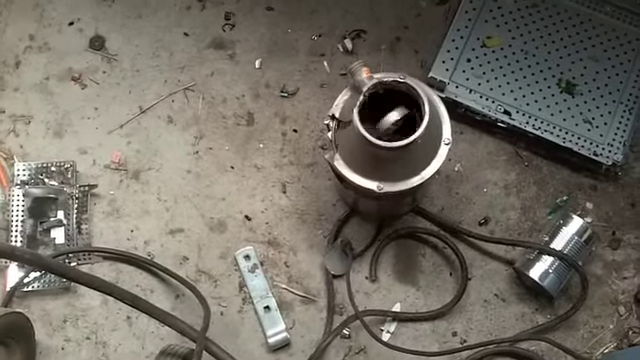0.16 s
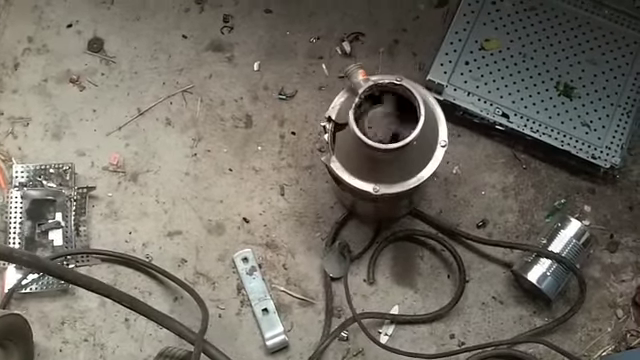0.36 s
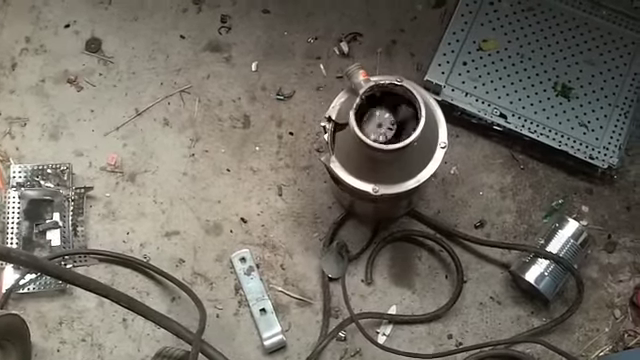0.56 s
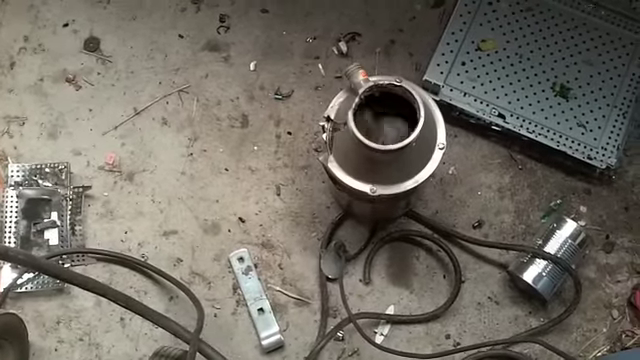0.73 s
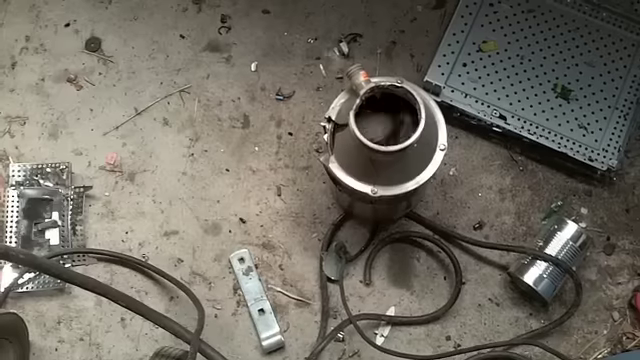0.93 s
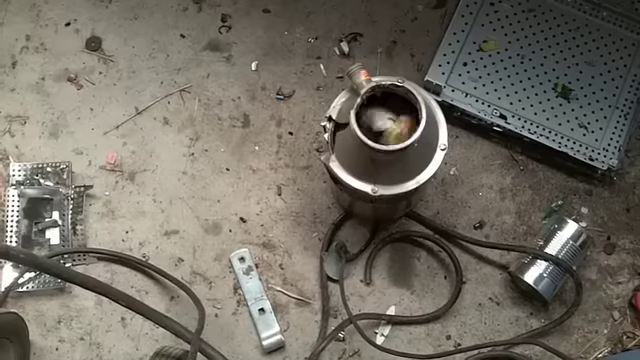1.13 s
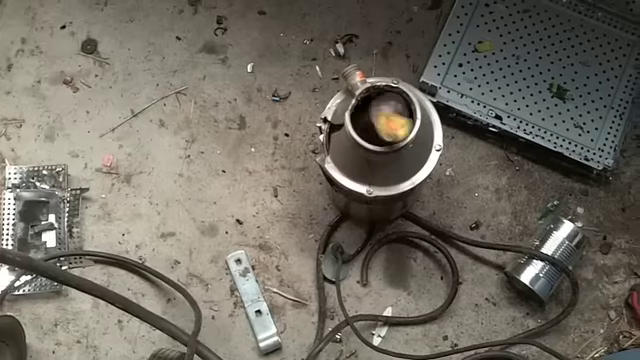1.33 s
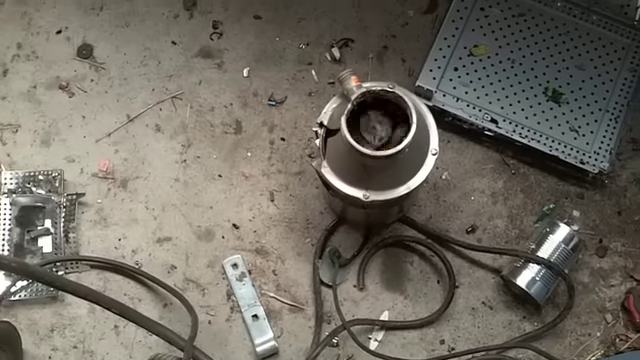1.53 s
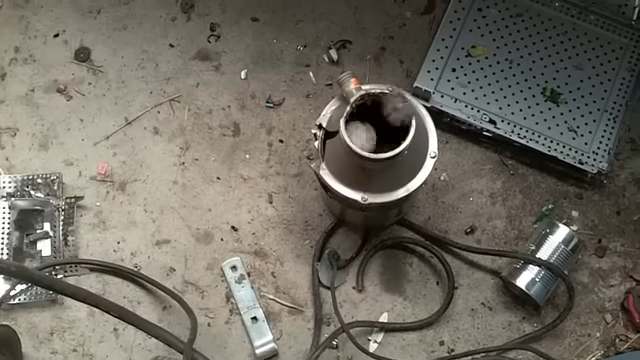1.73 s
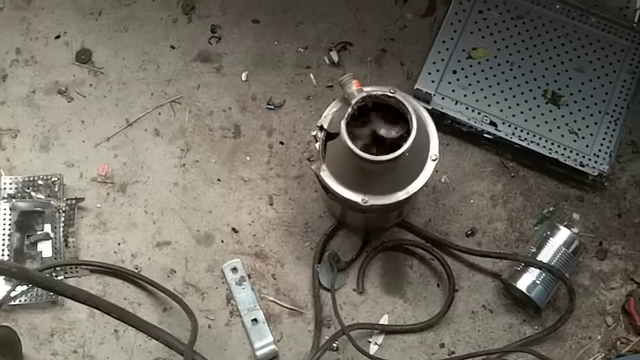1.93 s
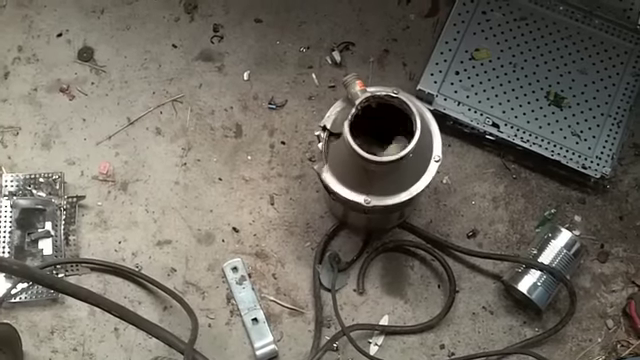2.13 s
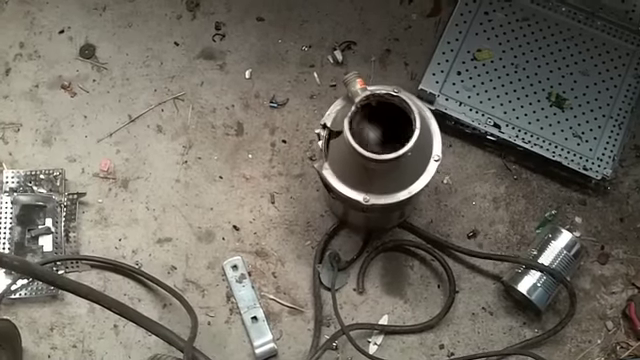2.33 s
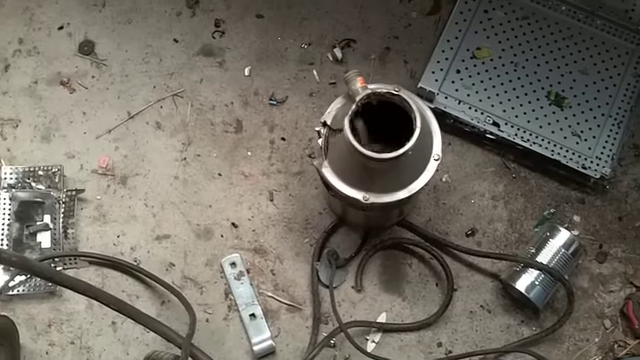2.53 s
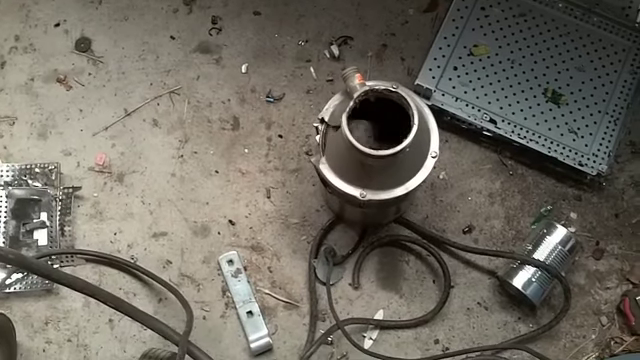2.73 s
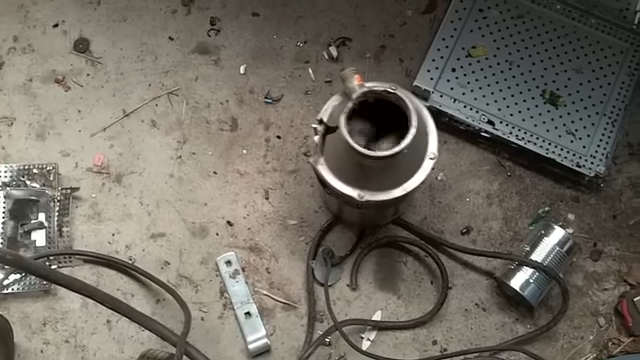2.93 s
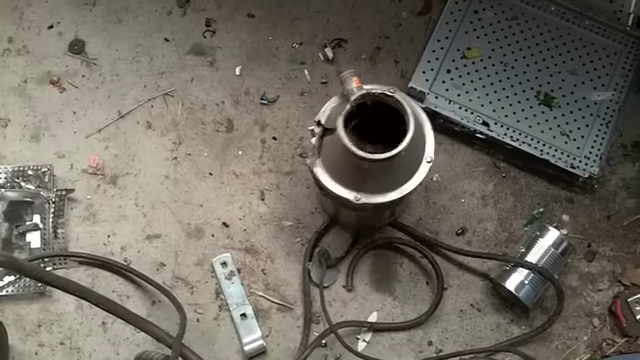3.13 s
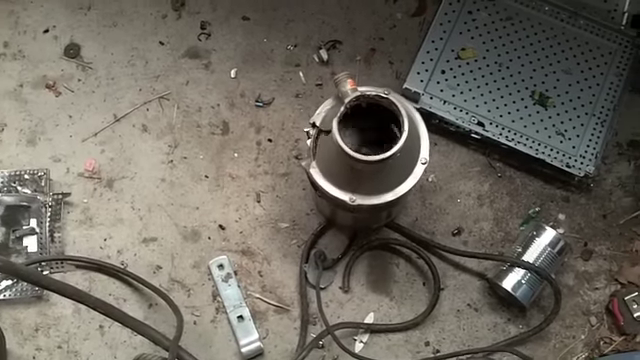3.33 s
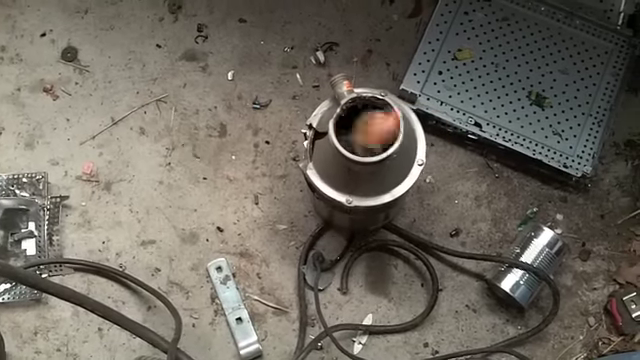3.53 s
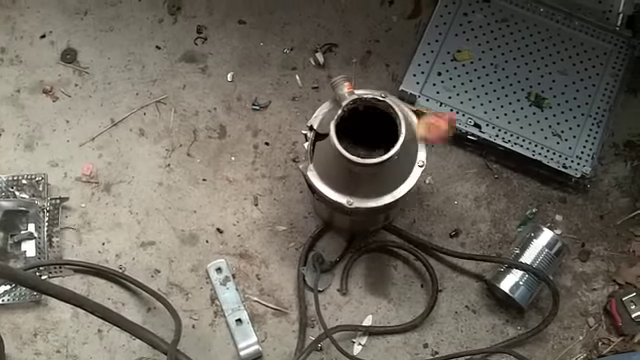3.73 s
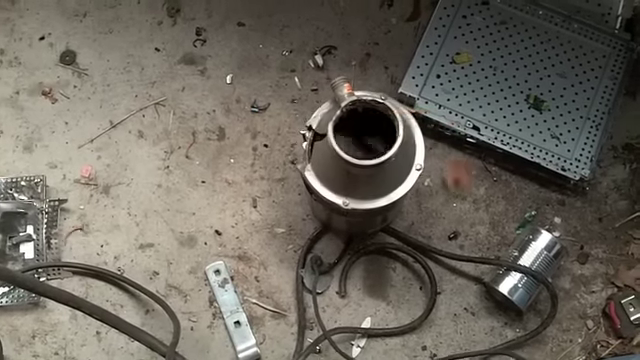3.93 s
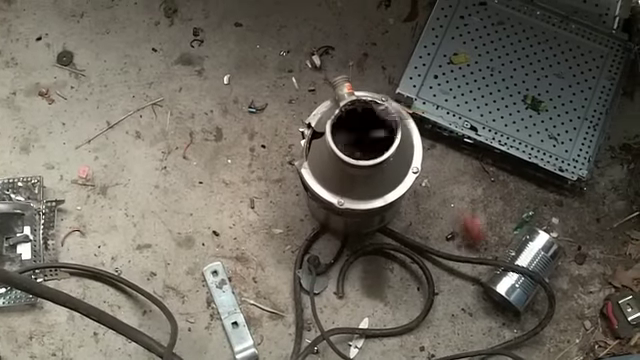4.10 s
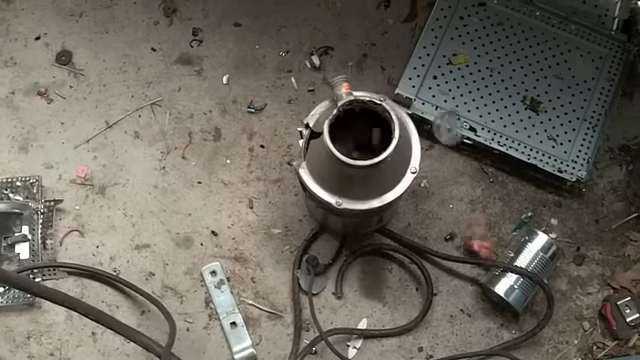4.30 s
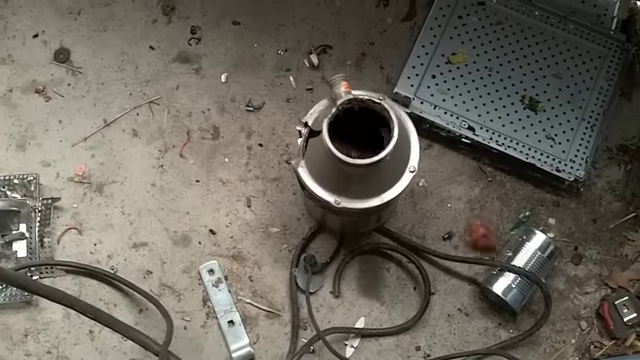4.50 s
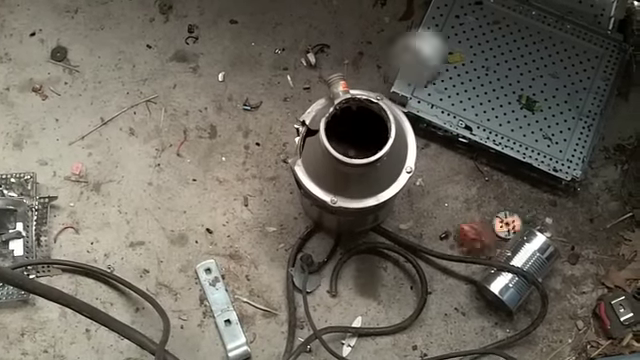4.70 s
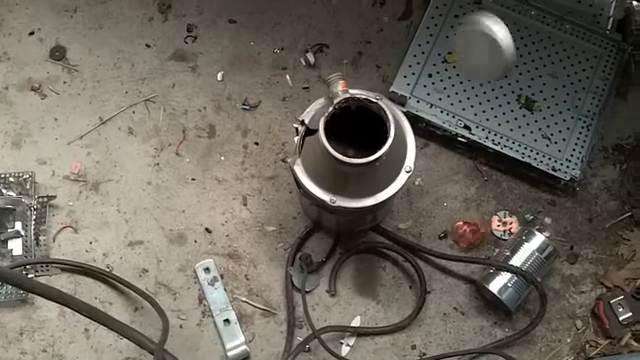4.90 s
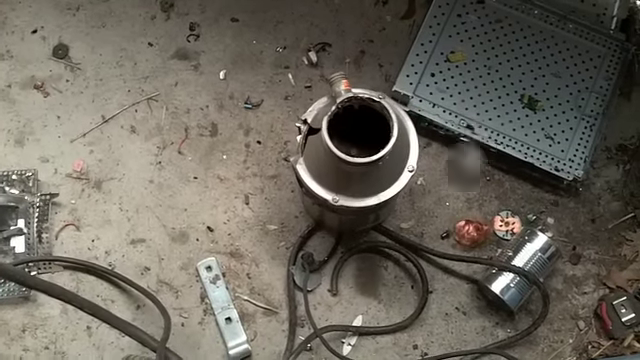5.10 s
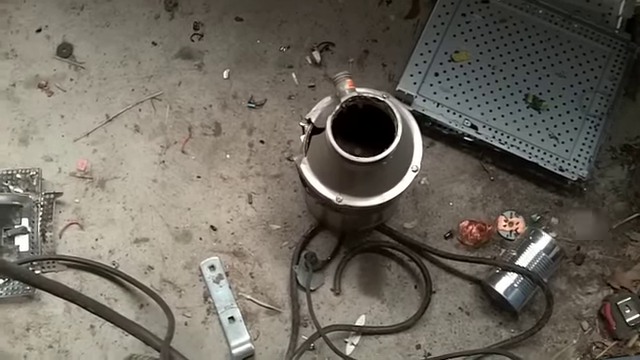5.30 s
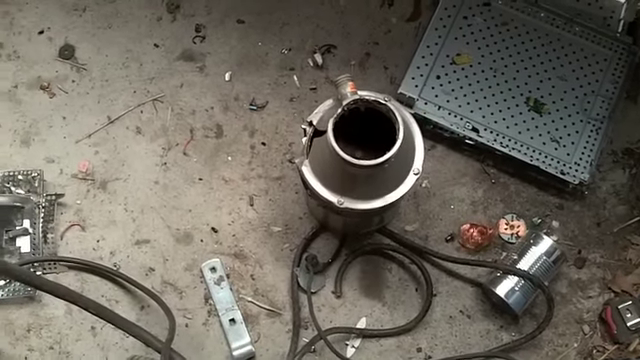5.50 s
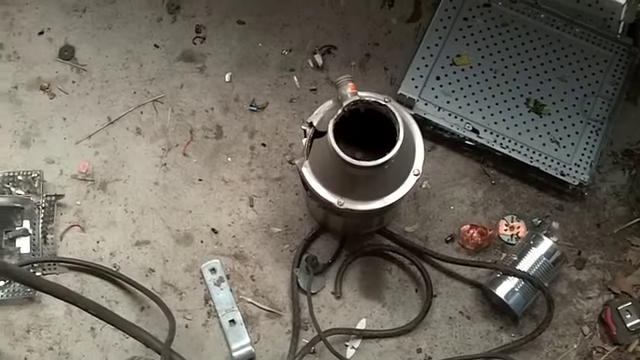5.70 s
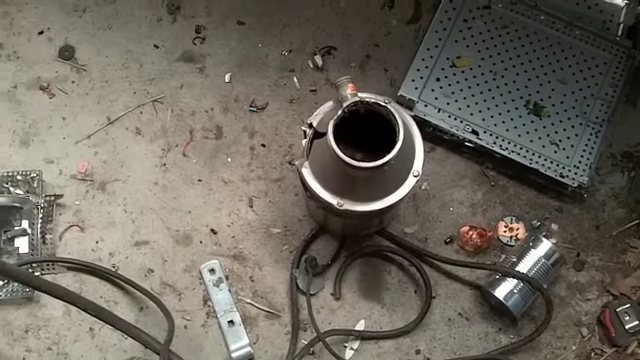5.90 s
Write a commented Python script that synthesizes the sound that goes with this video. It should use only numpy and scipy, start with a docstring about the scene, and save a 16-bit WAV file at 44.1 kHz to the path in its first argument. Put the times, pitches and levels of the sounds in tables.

```python
"""Garbage disposal, bare on a workshop floor, with loose metal in its chamber, close to a small microphone.
The spinning plate hurls the metal at the steel shell: short force bursts and swept scraps drive shell modes.
Once the metal is thrown out, the motor hums on nearly empty: wavering tones, housing rock, churned air.
A flung piece lands, rings and bounces: noise cracks with clatter, and modes that flutter as it tumbles."""
import sys
import numpy as np
from scipy import signal
from scipy.fft import rfft, irfft
from scipy.io import wavfile

SR = 44100
rng = np.random.default_rng(int(sys.argv[2]) if len(sys.argv) > 2 else 0)


def store_pcm(level_fs):
    """Save levels as 16-bit WAV."""
    pcm = np.round(np.clip(level_fs, -1, 1) * 32767).astype(np.int16)
    wavfile.write(sys.argv[1], SR, np.atleast_2d(pcm).T)


N = 262395
TIME = np.arange(N) / SR

# small scraps swept round the chamber: t/s, level/dB
SCRAP_LEVELS = [(0, -29), (4.05, -30), (4.18, -38), (4.21, -41), (4.238, -35), (4.26, -30.5), (4.62, -33),
                (4.66, -36.5), (4.8, -41), (4.86, -50), (5.1, -50.5), (5.95, -53)]
# metal hurled squarely against the wall: t/s, relative level/dB, thud/dB
WALL_KNOCKS = [(.157, -11, 0), (0.34, -12.5, 2.5), (.448, -16, 4), (0.593, -12.5, -6), (.708, -15, 0.5),
               (.798, -14, 4.5), (1.13, -23.5, 1.5), (1.206, -14.5, -0.5), (1.263, -9, 4), (1.48, -13, -5),
               (1.58, -12.5, -10), (1.6, -17, 4.5), (1.689, -13.5, 1.5), (1.824, -13.5, -3),
               (1.916, -12, -2), (2.048, -10, -11), (2.194, -18.5, 4.5), (2.564, -18, -3),
               (2.63, -13.5, -3), (2.691, -13, -20), (2.891, -15, -3), (2.944, -16.5, 0.5),
               (3.131, -16.5, -18), (3.201, -13, 1), (3.527, -15, -1), (3.675, -11, -0.5),
               (3.843, -9, -4.5), (4.132, -17.5, -8), (4.165, -10, -8.5), (4.248, -12.5, -4),
               (4.294, -18, 8.5), (4.369, -14.5, 1), (4.43, -13, 1), (4.469, -11, -11), (4.515, -20.5, 9)]


def amp(db):
    """Decibels to linear gain."""
    return 10 ** (np.asarray(db) / 20)


def unit(x):
    """Scale to rms 1."""
    return x / np.sqrt(np.mean(x ** 2) + 1e-20)


def normed(response):
    """Scale an impulse response to energy 1."""
    return response / np.linalg.norm(response)


def curves(rows):
    """Interpolate each column of a time table at every sample."""
    s, *columns = np.transpose(rows)
    return [np.interp(TIME, s, column) for column in columns]


def read(points, hz):
    """Interpolate a frequency table on a log axis."""
    f, value = np.transpose(points)
    return np.interp(np.log(hz + 1), np.log(f), value)


def add(mix, s, sound):
    """Mix a sound in, in place, from time s."""
    start = max(round(s * SR), 0)
    part = mix[start:][:len(sound)]
    part += sound[:len(part)]


def through(x, response):
    """Convolve x with an impulse response, cut to N."""
    return signal.oaconvolve(x, response)[:N]


def wander(rate_hz):
    """Smooth random curve of rms 1: noise with a Gaussian roll-off at rate_hz."""
    hz = np.fft.rfftfreq(N, 1 / SR)
    spectrum = rfft(rng.standard_normal(N))
    return unit(irfft(spectrum * np.exp(-(hz / rate_hz) ** 2), N))


def colour(points, peaks=(), size=4096):
    """Minimum-phase impulse response of a spectrum with resonances or dips on it."""
    hz = np.fft.rfftfreq(size, 1 / SR)
    gain = amp(read(points, hz))
    for centre_hz, width_hz, db in peaks:
        offset_hz = hz - centre_hz
        gain = gain * abs((offset_hz + .5j * width_hz * amp(db)) / (offset_hz + .5j * width_hz))
    log_gain = np.log(np.concatenate([gain, gain[-2:0:-1]]))
    causal_spectrum = np.exp(np.conj(signal.hilbert(log_gain)))
    return np.fft.ifft(causal_spectrum).real[:size // 2]


def tail(decays, size=22050):
    """Dense thicket of modes or echoes: random signs, each band decaying at its own t60."""
    hz, t, z = signal.stft(rng.choice([-1., 1.], size), SR, nperseg=128)
    decay = amp(-60 * t / read(decays, hz)[:, None])
    return normed(signal.istft(z * decay, SR, nperseg=128)[1])


def contact(force, level_db, thud_db, bright_db, hollow_db=0, own_modes=()):
    """Contact-force burst: heavy blows have more low end, sharp edges more treble."""
    points = [(750, 1.22 * thud_db + hollow_db), (1100, thud_db), (2000, thud_db),
              (3200, 0.014), (5000, 0.011), (7500, bright_db)]
    return amp(level_db) * np.convolve(unit(force), colour(points, own_modes, size=512))


def motor():
    """Wavering hum, the unmounted housing rocking on the floor, and churned air."""
    # motor vibration: t/s, hum/dB, fast rock/dB, slow rock/dB
    vibration = [(0, -73.5, -67, -71), (4.45, -65, -80, -71), (4.68, -57, -70, -64),
                 (4.78, -49.5, -46.5, -45), (5.3, -50, -52, -78), (5.48, -50.5, -61, -45),
                 (5.8, -52, -56, -45.5), (5.95, -50, -54, -52)]
    # tones of shaft, magnetic pull and casing: f/Hz, level re hum/dB
    hum_tones = [(29.6, -4), (120, -3), (150, -12), (239.5, -9), (391, -12), (591, -13), (631, -13.5)]
    # spectrum shape of air churned by the rotor: f/Hz, relative density/dB per Hz
    air_spectrum = [(20, 0), (100, 7), (180, -4.5), (260, 4.5), (500, -1), (630, 3.5), (900, -6),
                    (1600, -3), (3000, -12), (6000, -64), (16000, -71)]
    fast_rock_hz, slow_rock_hz = 70.4, 48.4

    def tone(hz, waver_rad):
        """Sine of rms 1 with slow random phase waver."""
        cycles = hz * TIME + rng.random()
        return np.sqrt(2) * np.sin(2 * np.pi * cycles + waver_rad * wander(1.8))

    hum_db, fast_db, slow_db = curves(vibration)
    hum = amp(hum_db) * sum(amp(db) * tone(hz, waver_rad=0.23) for hz, db in hum_tones)
    fast_rock = amp(fast_db) * tone(fast_rock_hz, waver_rad=0.33)
    slow_rock = amp(slow_db) * tone(slow_rock_hz, waver_rad=0.23)
    air = amp(hum_db + 0.5) * through(rng.standard_normal(N), normed(colour(air_spectrum)))
    return hum + fast_rock + slow_rock + air


def tumbling_ring(ring_db, low_db):
    """Piece modes swell and flutter as its faces turn towards the microphone and away."""
    # modes of the flung piece: f/Hz, level/dB, t60/s, bloom time/s
    piece_modes = [(2030, 5.5, .26, .06), (3270, -16, .15, .005), (3480, -11, .2, .005),
                   (4100, 0, .24, .04), (4720, 2.5, .2, .015), (6230, -16, .25, .03),
                   (7690, -11, .15, .005), (11090, -22, .12, .005)]
    slowest_spin_hz = 20.3
    t, ring = TIME[:SR // 2], 0
    for hz, db, t60_s, bloom_s in piece_modes:
        phase = 2 * np.pi * (hz * t + rng.random())
        spin_hz = slowest_spin_hz * rng.uniform(1.0, 1.41)
        facing = np.cos(2 * np.pi * (spin_hz * t + rng.random()))
        mode = facing * np.sin(phase) + .4 * np.cos(phase)
        decay = amp(ring_db + db + low_db * (hz < 2500) - 60 * t / t60_s)
        bloom = 1 - np.exp(-(t / bloom_s) ** 2)
        ring = ring + decay * bloom * mode
    flutter_db = 2.2 * wander(70)[:len(t)]
    return ring * amp(flutter_db)


def flung_piece():
    """Each landing is a short noise crack with a clatter after it, and sets the piece ringing."""
    # landings: t/s, crack/dB, brightness/dB, clatter re crack/dB, ring/dB, extra ring below 2.5 kHz/dB
    landings = [(5.264, -15, 13, -4, -17, 1.5), (5.5377, -24, -3, 10, -27, -10),
                (5.55, -11.5, -7, -1.5, -30, -3), (5.603, -41, -3, 18, -20.5, -8),
                (5.628, -22, -1, -3, -56, -4), (5.725, -29, -4, 2.5, -35, -11)]
    # impact on the floor, spectrum shape: f/Hz, relative density/dB per Hz
    crack_spectrum = [(60, -9.5), (500, -15), (1500, -5.5), (2400, 3.5), (3300, 12), (5000, 2.5),
                      (7000, -6), (9500, -14), (12000, -16), (16000, -30)]
    clatter_decay = [(500, 0.19), (3500, 0.12), (12000, 0.15)]  # f/Hz, t60/s
    cracks, clatter, rings = np.zeros(N), np.zeros(N), np.zeros(N)
    t = TIME[:SR // 250]
    for s, crack_db, bright_db, clatter_db, ring_db, low_db in landings:
        force = rng.standard_normal(len(t)) * np.exp(-t / 0.0017)
        crack = contact(force, crack_db, 0, bright_db)
        add(cracks, s, crack)
        add(clatter, s, amp(clatter_db) * crack)
        add(rings, s, tumbling_ring(ring_db, low_db))
    clatter = through(clatter, tail(clatter_decay))
    return through(cracks + clatter, normed(colour(crack_spectrum))) + rings


def grit(chatter_db, chatter_hz, ticks_hz, rub):
    """Metal skipping over metal: tiny ticks and rubbing noise, clumped by random chatter."""
    ticks = rng.standard_normal(N) * (rng.random(N) < ticks_hz / SR)
    rubbing = rub * rng.standard_normal(N)
    return unit((unit(ticks) + rubbing) * amp(chatter_db * wander(chatter_hz)))


def on_the_plate():
    """Rattle gain: thins while the metal flies across the chamber to its next knock."""
    flight_s, flight_db = 0.022, -3
    gain = np.ones(N)
    for s, *_ in WALL_KNOCKS:
        gain[round((s - flight_s) * SR):round(s * SR)] = amp(flight_db)
    return gain


def contacts():
    """Wall contacts: knocks with skids, scrapes, random taps, as (t/s, length/s, relative level/dB, thud/dB)."""
    # metal caught and dragged along the wall: t/s, length/s, relative level/dB, thud/dB
    scrapes = [(0.021, 0.021, -23.5, 0.5), (.133, 0.073, -30, 9), (0.2, 0.068, -24, -10),
               (0.381, 0.031, -29.5, 5), (.455, 0.027, -22, 4), (0.583, .012, -22.5, 4),
               (.625, 0.032, -24, -6), (.675, 0.074, -23.5, 0.5), (0.848, 0.11, -25, -2.5),
               (1.014, 0.026, -24, 4), (1.092, 0.035, -21.5, -1.5), (1.306, 0.0076, -17.5, 1),
               (1.365, 0.038, -23.5, 0.5), (1.47, 0.014, -19.5, -12), (1.503, 0.05, -27.5, 0),
               (1.617, 0.05, -27, -0.5), (1.905, 0.022, -23, 0.5), (1.955, 0.074, -26.5, 0.5),
               (2.08, 0.045, -22, -0.5), (2.271, 0.051, -21, 0), (2.377, 0.017, -18, -2.5),
               (2.461, 0.061, -24.5, -4), (2.577, 0.048, -26.5, 4), (2.65, 0.083, -30.5, 6),
               (2.786, 0.048, -23.5, 3.5), (2.859, 0.015, -20, 1.5), (2.978, .115, -24, -8.5),
               (3.268, 0.082, -23.5, -1.5), (3.424, 0.047, -21, 2), (3.532, 0.13, -28, 1.5),
               (3.721, 0.045, -23.5, -7), (3.795, 0.029, -22.5, 2.5), (3.87, 0.18, -22, -3),
               (4.103, 0.025, -23, -0.5), (4.289, 0.061, -27.5, -4.5), (4.544, 0.033, -21.5, -5.5),
               (4.586, 0.034, -18, 1), (4.944, 0.017, -40.5, -14)]
    knock_s, skid_s, skid_db, skid_thud_db = 0.0038, .02, -29, -2.6
    taps_per_s, tap_s = 16, 0.0027
    tap_re_scraps_db, tap_spread_db, thud_spread_db = 9.5, 1.5, 2.5
    for s, level_db, thud_db in WALL_KNOCKS:
        yield s, knock_s, level_db, thud_db
        yield s + knock_s, skid_s, skid_db, skid_thud_db  # the plate pushes on with an even force
    yield from scrapes
    scraps_db = curves(SCRAP_LEVELS)[0]
    strength, weight = rng.standard_normal(N), rng.standard_normal(N)
    for at in np.flatnonzero(rng.random(N) < taps_per_s / SR):
        tap_db = scraps_db[at] + tap_re_scraps_db + tap_spread_db * strength[at]
        yield at / SR, tap_s, tap_db, thud_spread_db * weight[at]


def grinding():
    """Blows and circling scraps drive the shell, which rings differently at each place struck."""
    # broad response of the steel shell: f/Hz, relative gain/dB
    shell_response = [(30, -16), (170, -24), (400, -22), (600, -12.5), (930, -14), (1150, -9), (2300, -7),
                      (3300, -2.5), (4900, 1), (5250, -8), (6500, -3.5), (9500, -9.5), (12300, -13),
                      (15500, -34.5)]
    # resonances of chamber and shell: f/Hz, width/Hz, boost/dB
    chamber_modes = [(250, 22, 8.5), (656, 56.6, 13), (790, 50, 7), (1359, 30, 5), (2109, 62, 6),
                     (2251, 17, 8.5), (3904, 150, 6), (4826, 230, 3)]
    # decay of the shell: f/Hz, t60/s
    shell_decay = [(200, .05), (660, .12), (1500, .07), (4500, .11), (12000, .045)]
    places, shaft_hz = 12, 29.73
    slip_hz, slip_db = 69, 4.05  # dragged metal catches and slips
    edge_db = -0.6  # treble of a sharp edge
    sharp_db, blunting = -23, 0.23  # above sharp_db edges flatten: dB of treble lost per dB of level

    force = np.zeros((places, N))
    scrape = grit(chatter_db=3.5, chatter_hz=243, ticks_hz=5190, rub=0.61)
    scrape = scrape * amp(slip_db * wander(slip_hz))

    lugs = 1 + 0.27 * np.cos(2 * np.pi * 2 * shaft_hz * TIME)  # two lugs pass each turn
    rattle = lugs * grit(chatter_db=2.6, chatter_hz=150, ticks_hz=2000, rub=.4)
    scraps = contact(rattle, 0, 1, -4.5)[:N]
    scraps = amp(curves(SCRAP_LEVELS)[0]) * on_the_plate() * scraps
    force[rng.integers(0, places, N), np.arange(N)] += scraps  # each sample at a random place

    shell = [tail(shell_decay, size=8192) for place in force]
    jolts, t = np.zeros(N), TIME[:SR // 20]
    for k, (s, length_s, level_db, thud_db) in enumerate(contacts()):
        samples = max(round(length_s * SR), 20)
        burst = scrape.take(round(s * SR) + np.arange(samples), mode="wrap")
        bite = 1 - np.exp(-np.linspace(.02, 1, samples) / 0.017)  # the edge digs in
        hollow_db = 1.47 * np.log10(samples / SR / 0.01)  # longer pushes pump the chamber air
        bright_db = edge_db - blunting * max(level_db - sharp_db, 0)
        # the crumpled metal rings anew at each turn
        own_modes = [(rng.uniform(1350, 2030), 250, 3), (rng.uniform(3100, 4860), 300, 3)]
        blow = contact(burst * bite, level_db - 2.5, thud_db, bright_db, hollow_db, own_modes)
        add(force[k % places], s, blow)
        # each contact jolts the housing
        rock = np.sin(2 * np.pi * rng.uniform(31, 87) * t) * np.exp(-t / 0.0098)
        add(jolts, s, amp(level_db - 10.5) * np.sqrt(samples / SR) * rock)
    ringing = sum(through(place, ring) for place, ring in zip(force, shell))
    struck = force.sum(0) + amp(-2.0) * ringing
    return through(struck, normed(colour(shell_response, chamber_modes))) + jolts


def scene():
    """Motor, and metal sounds with workshop reverberation."""
    # decay of the workshop: f/Hz, t60/s
    room_decay = [(200, 1), (2000, 1), (5000, 0.81), (14000, 1)]
    machine, room = motor(), tail(room_decay)
    metal = flung_piece() + grinding()
    reverb = amp(-25.5) * through(metal, room)
    return (metal + reverb + machine)[None]


def record(dry):
    """Hollow, comb-like colour: fixed dips, soft overload, low-pass band limit."""
    # dips in the overall colour: f/Hz, width/Hz, depth/dB
    comb_dips = [(2708, 843, -79), (5516, 400, -23), (7844, 4670, -25), (10940, 530, -29),
                 (14400, 420, -12)]
    edge_hz, ceiling = 15450, .9
    heard = through(dry[0], colour([(20, 0), (20000, 0)], comb_dips))
    heard = ceiling * np.tanh(heard / ceiling)
    low_pass = signal.firwin(301, edge_hz, window=("kaiser", 9), fs=SR)
    return signal.oaconvolve(heard, low_pass, "same")[None]


dry = scene()
out = record(dry)
store_pcm(out)
```